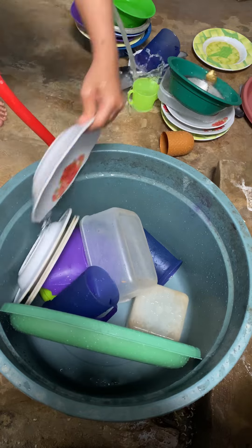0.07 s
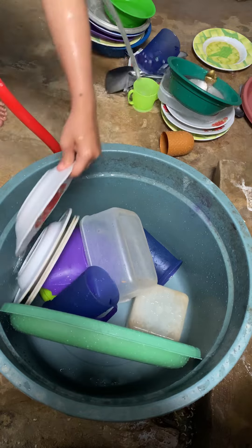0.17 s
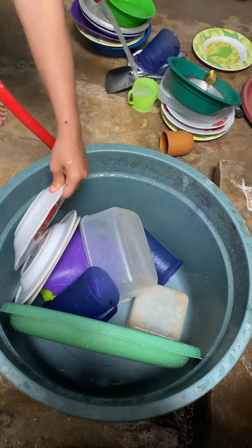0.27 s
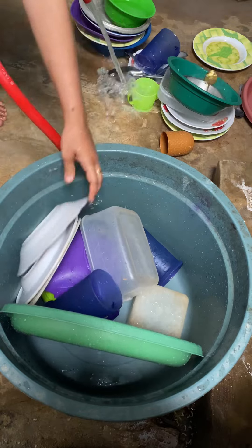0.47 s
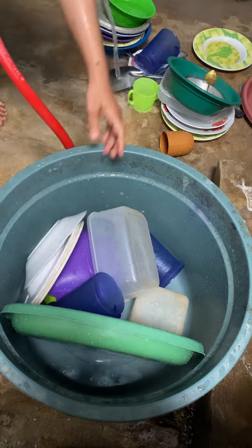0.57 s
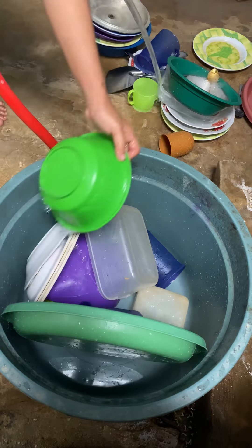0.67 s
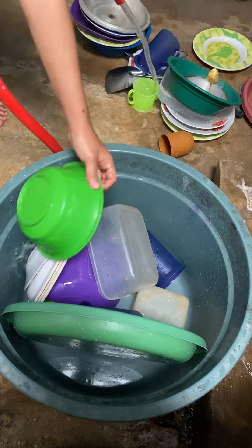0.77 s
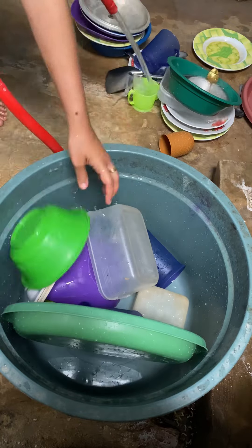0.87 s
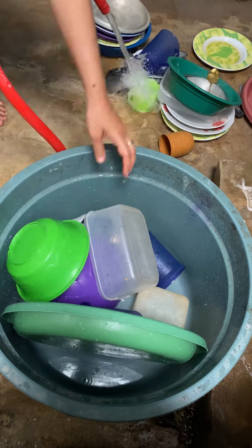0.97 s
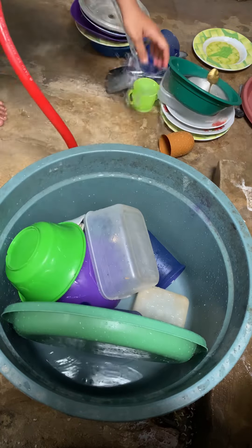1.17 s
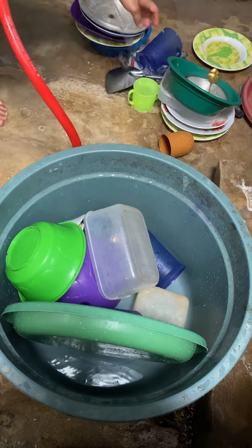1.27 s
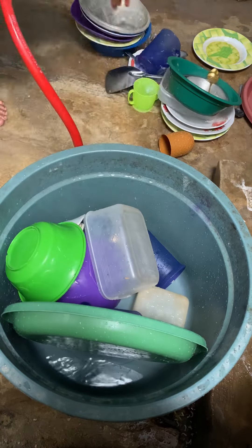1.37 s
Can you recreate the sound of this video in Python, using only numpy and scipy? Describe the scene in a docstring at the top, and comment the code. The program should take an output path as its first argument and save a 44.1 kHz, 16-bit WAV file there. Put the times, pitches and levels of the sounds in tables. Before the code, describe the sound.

Close, clattering dishes in an echoing yard. A plate clacks and rattles against other plates, a plastic tub gives one hollow thump, and a plastic bowl lands and bounces to rest, over a faint, steady spatter of hose water.

```python
"""A walled yard, where dishes are loaded into a big plastic tub close to the microphone.
A plate knocks against a stack and slides down it; the tub booms; a plastic bowl drops in and
bounces. Each contact gives a clack, a short note and the ring of the object, and echoes off the
walls. All the while, water from a hose hisses and spatters on the concrete nearby."""
import sys
import numpy as np
from scipy import signal
from scipy.fft import rfft, irfft, next_fast_len
from scipy.io import wavfile
from scipy.ndimage import uniform_filter1d

SR = 44100
rng = np.random.default_rng(int(sys.argv[2]) if len(sys.argv) > 2 else 0)


def transcribe(u):
    """Save the signal u as a 16-bit wav file named by the first command-line argument.

    u: samples, shape (n,) or (channels, n), limited to [-1, 1]; the rate is SR.
    q: integer samples, one column per channel.
    """
    v = np.clip(np.atleast_2d(u).T, -1, 1)
    q = np.round(v * 32767).astype(np.int16)
    wavfile.write(sys.argv[1], SR, q)


N = 61739
TIME = np.arange(N) / SR

# Stereo image of distant sound. Each row: frequency in Hz, left-right likeness (1 is mono).
FAR_LIKENESS = [(150, .97), (320, .88), (700, .35), (1400, .5), (3000, .25), (6000, .5), (10000, .78)]


def from_db(db):
    """Decibels to gain."""
    return 10 ** (np.asarray(db) / 20)


def at_hz(points, size):
    """A curve of (Hz, value) points at the bins of an FFT, joined on a log-frequency axis."""
    hz, values = np.transpose(points)
    return np.interp(np.log(np.fft.rfftfreq(size, 1 / SR) + 1), np.log(hz), values)


def colour(x, points):
    """Minimum-phase EQ through the given (Hz, dB) points, so nothing rings ahead of an attack."""
    size = next_fast_len(2 * x.shape[-1], True) * 2
    cepstrum = irfft(np.log(from_db(at_hz(points, size))))
    cepstrum[1:size // 2] *= 2
    cepstrum[size // 2 + 1:] = 0
    return irfft(rfft(x, size) * np.exp(rfft(cepstrum)))[..., :x.shape[-1]]


def stereo_noise(likeness, size):
    """White noise whose stereo width changes with frequency."""
    mid, side = rfft(rng.standard_normal((2, size)))
    alike = np.clip(at_hz(likeness, size), 0, 1)
    mid, side = mid * np.sqrt((1 + alike) / 2), side * np.sqrt((1 - alike) / 2)
    return irfft(np.array([mid + side, mid - side]), size)


def grain(size, depth_db, per_s):
    """A fast random flutter of gain, with mean power 1."""
    steps = from_db(depth_db * rng.standard_normal(N))
    gain = np.interp(np.arange(size) * per_s / SR, np.arange(N), steps)
    return gain / np.sqrt(np.mean(gain ** 2))


def hose_water():
    """Drops hit concrete in a fine spatter that follows the flow, with a few fuller splashes."""
    # Tone of the spatter. Each row: frequency in Hz, level in dB.
    spectrum = [(25, -5), (60, 1), (150, 4), (300, 1.5), (600, -2), (1000, -2.5), (1600, -1.7), (2800, .7),
                (5500, -1.8), (8000, -2), (11000, -2.3), (11900, -8), (12800, -40), (16000, -70)]
    # Strength of the flow. Each row: time in seconds, level in dB.
    flow = [(0, -32), (.08, -34.8), (.15, -33), (.21, -35.2), (.38, -35), (.45, -32.3), (.66, -32),
            (.8, -36), (1.05, -36), (1.15, -31.5), (1.24, -29.8), (1.32, -31.8), (1.4, -32.7)]
    # Splashes on the ground. Each row: start in seconds, level in dB, centre in Hz, fade in seconds.
    splashes = [(.043, -32.5, 1650, .018), (1.24, -36.5, 1450, .06), (1.345, -37, 540, .04)]
    spatter = stereo_noise(FAR_LIKENESS, N) * grain(N, depth_db=2.5, per_s=400)
    out = colour(spatter, spectrum) * from_db(np.interp(TIME, *np.transpose(flow)))
    width = .45  # a splash's bandwidth, roughly, as a share of its centre
    edge = 1 + width / 2
    for start, db, hz, fade_s in splashes:
        band = signal.butter(2, [hz / edge, hz * edge], "band", fs=SR, output="sos")
        burst = stereo_noise(FAR_LIKENESS, N) * (TIME > start) * np.exp(-np.abs(TIME - start) / fade_s)
        makeup = np.sqrt(SR / 2 / (hz * width))
        out += from_db(db) * makeup * signal.sosfilt(band, burst)
    return out


def ringing(contacts, modes):
    """Every contact sets all the modes ringing as dying sines, each with a slightly random strength."""
    starts, db, _, tilt, _, _ = np.transpose(contacts)
    spread_db = rng.standard_normal((len(starts), len(modes)))
    middle_hz = modes[len(modes) // 2][0]
    out = 0
    for k, (hz, level, t60) in enumerate(modes):
        strike_db = db + level + tilt * np.log2(hz / middle_hz) + spread_db[:, k]
        clicks = np.zeros(N)
        clicks[(starts * SR).astype(int)] = from_db(strike_db)
        decay, angle = from_db(-60 / (t60 * SR)), 2 * np.pi * hz / SR
        feedback = [1, -2 * decay * np.cos(angle), decay * decay]
        out += (-1) ** k * signal.lfilter([0, np.sin(angle)], feedback, clicks + 1e-18)
    return out


def clack(contacts, spectrum, fade_s, attack_s=.0006, size=4096):
    """Each contact chatters for some milliseconds and sets off many dense, quickly damped modes."""
    # Stereo image of close sound. Each row: frequency in Hz, left-right likeness (1 is mono).
    near_likeness = [(150, .99), (350, .9), (700, .66), (1400, .82), (3000, .52), (6000, .55), (10000, .88)]
    out, t = np.zeros((2, N + size)), TIME[:size]
    for start, db, chatter_s, tilt, _, _ in contacts:
        envelope = np.minimum(t / attack_s, 1) * np.exp(-np.maximum(t - chatter_s, 0) / fade_s)
        burst = stereo_noise(near_likeness, size) * envelope * grain(size, depth_db=2.3, per_s=1200)
        tone = [(hz, level + db + tilt * np.log2(hz / 1500)) for hz, level in spectrum]
        first = int(start * SR)
        out[:, first:first + size] += colour(burst, tone)
    return out[:, :N]


def ripple(x, depth_db=2.2, spacing_hz=70):
    """Many small, close resonances that all contacts on one object share."""
    hz = np.arange(600, 16000, spacing_hz)
    db = depth_db * rng.standard_normal(len(hz))
    db -= 10 * np.log10(np.mean(from_db(db) ** 2))  # keep the mean power
    return colour(x, [(500, 0), *zip(hz, db)])


def spot_notes(contacts, life_cycles, sharp, rise_s=.0012, spring_back_s=.014):
    """The struck spot sounds a short note; dented plastic starts sharp and sags as it springs back."""
    out = 0
    for start, _, _, _, hz, db in contacts:
        t = np.maximum(TIME - start, 0)
        cycles = hz * (t + sharp * spring_back_s * (1 - np.exp(-t / spring_back_s)))
        envelope = from_db(db - 60 * cycles / life_cycles) * (1 - np.exp(-t / rise_s))
        out += envelope * np.sin(2 * np.pi * cycles)
    return out


def yard_echo(x, build_s=.008):
    """Diffuse echo from walls and ground; each band dies at its own rate."""
    # Bands of the echo. Each row: centre in Hz, level in dB, seconds to fall 60 dB.
    bands = [(100, -1, .45), (200, 1.5, .52), (350, -1, .6), (700, -1.5, .95), (1300, -3, .5),
             (2600, -1.5, .38), (5200, -2.5, .32), (10500, -6, .26)]
    noise, tail = rfft(stereo_noise(FAR_LIKENESS, N)), 0
    for k, (_, db, t60) in enumerate(bands):
        share = at_hz([(row[0], j == k) for j, row in enumerate(bands)], N)
        equal_energy = np.sqrt(np.log(1e6) / (t60 * SR))
        tail += irfft(noise * share, N) * from_db(db - 60 * TIME / t60) * equal_energy
    tail *= 1 - np.exp(-TIME / build_s)
    return signal.fftconvolve(x.mean(0)[None], tail, axes=1)[:, :N]


def struck(contacts, modes, spectrum, ring_db, clack_db, clack_fade_s, echo_db, note_cycles, sharp=0):
    """A struck object: its ring, its clack, the notes of the struck spots and their echo."""
    # Each contact: start in seconds, level in dB, chatter in seconds, treble tilt in dB per octave,
    # the spot's note in Hz, that note's level in dB.
    near = from_db(ring_db) * ringing(contacts, modes)
    near = near + from_db(clack_db) * ripple(clack(contacts, spectrum, clack_fade_s))
    near += spot_notes(contacts, note_cycles, sharp)
    return near + from_db(echo_db) * yard_echo(near)


def tub():
    """The big plastic tub thuds softly under the dishes and booms at one hard bump."""
    # Bumps on the tub. Each row: a contact, as in struck().
    bumps = [(.002, -42, .01, -3, 120, -34), (.258, -33, .005, -1, 175, -29),
             (.34, -36, .008, -2.5, 115, -25), (.455, -39, .01, -3, 115, -35),
             (.486, -36, .005, -2, 205, -23), (.547, -31, .005, -2, 165, -21),
             (.568, -29, .008, -2, 195, -18), (.605, -29, .01, -2.5, 115, -17),
             (.6642, -7, .004, -.4, 575, -3.5), (.670, -18, .005, -2.6, 135, -11),
             (.674, -24, .012, 1, 410, -11.5), (.846, -30, .005, -1.5, 110, -24),
             (.861, -29, .005, -1, 110, -20), (.878, -25, .005, -1.5, 185, -14),
             (.928, -32, .005, -2.5, 205, -22)]
    # The tub's low modes. Each row: pitch in Hz, level in dB, seconds to fall 60 dB.
    modes = [(82, -21, .25), (126, -13, .27), (144, -8.5, .42), (180, -7, .12), (228, -9, .14),
             (328, -16, .3), (435, -7, .11), (474, -8, .19), (620, -1, .07), (705, -2, .1), (880, -17, .2),
             (1077, -10, .14), (1863, -17, .1)]
    # Tone of its dull clack. Each row: frequency in Hz, level in dB.
    spectrum = [(25, -38), (100, 7), (170, 14.5), (300, 0), (600, 17.5), (900, 5), (1500, -3), (3200, -5),
                (4500, -17), (9000, -25), (16000, -50)]
    return struck(bumps, modes, spectrum, ring_db=-4.3, clack_db=.6, clack_fade_s=.004,
                  echo_db=-8, note_cycles=19, sharp=.3)


def level_dips():
    """A gain that drops suddenly, twice, and comes straight back."""
    # Brief dips in level. Each row: start in seconds, depth in dB, recovery in seconds.
    dips = [(.027, -11, .017), (.626, -12, .033)]
    db = sum(depth * (TIME > start) * np.clip(1 - ((TIME - start) / recovery) ** 2, 0, 1)
             for start, depth, recovery in dips)
    return from_db(uniform_filter1d(db, size=64))


def plate_on_stack(cut_s=.6255, cut_fade_s=.0015):
    """The plate knocks and rattles down the stack; its sound and echo are cut off, as at an edit."""
    # The plate's knocks, then its slips down the stack. Each row: a contact, as in struck().
    knocks = [(.2402, -9.3, .005, .9, 1255, -13.5), (.2475, -12.5, .005, -.5, 1290, -12),
              (.2585, -10.5, .008, -.9, 900, -11.5), (.275, -25, .025, 0, 1900, -26),
              (.320, -20, .004, 2.7, 2850, -22), (.428, -32, .02, -1, 700, -37),
              (.46, -31, .015, 0, 1230, -40)]
    slips = [(.4798, -12.7, .005, 2.4, 3620, -14), (.488, -17, .010, 0, 810, -21),
             (.497, -22, .008, -.5, 1220, -19), (.5125, -17, .006, -.6, 760, -19),
             (.523, -18, .003, .3, 2400, -20), (.528, -10.5, .004, .1, 670, -11),
             (.5485, -16.8, .014, 0, 480, -26), (.569, -17.8, .011, -.4, 350, -21),
             (.5915, -16, .008, 0, 620, -21), (.606, -23.5, .011, .4, 6900, -25)]
    # Modes of plate and stack. Each row: pitch in Hz, level in dB, seconds to fall 60 dB.
    plate_modes = [(448, -12, .17), (690, -15, .4), (857, -4, .15), (1160, -3, .15), (1240, -3, .12),
                   (1306, -5, .1), (1682, -7, .11), (1872, -16, .13), (1922, -15, .16), (2780, -13, .16),
                   (2980, -11, .12), (3620, -13, .16), (3950, -13, .16), (6860, -11, .07)]
    stack_modes = [(390, -11, .12), (565, -10, .12), (680, -8, .1), (790, -14, .1), (1240, -12, .12),
                   (1410, -15, .08), (1859, -10, .11), (2331, -8, .09), (2450, -10, .07), (2803, -11, .09),
                   (3666, -10, .07), (5100, -10, .09), (5212, -11, .07), (6918, -13, .07)]
    # Tone of their bright clacks. Each row: frequency in Hz, level in dB.
    plate_spectrum = [(30, -35), (120, 2), (200, 3), (330, 0), (700, 4.5), (1200, 6.5), (2000, 1.5),
                      (3000, .5), (4300, -3), (6500, -4), (8000, -8), (11500, -6), (13500, -33),
                      (16000, -45)]
    stack_spectrum = [(30, -35), (110, -4), (220, 0), (340, 1), (700, 5.5), (1000, 1.5), (2500, 1),
                      (5500, .5), (8000, -4), (11500, -.5), (13500, -21), (16000, -21)]
    knocking = struck(knocks, plate_modes, plate_spectrum, ring_db=-6, clack_db=0, clack_fade_s=.006,
                      echo_db=-7, note_cycles=55)
    sliding = struck(slips, stack_modes, stack_spectrum, ring_db=-3.5, clack_db=-.3, clack_fade_s=.0065,
                     echo_db=-9, note_cycles=45)
    return (knocking + sliding) * np.exp(-np.maximum(TIME - cut_s, 0) / cut_fade_s)


def bowl():
    """A plastic bowl drops in and bounces to rest; two faint modes ring on."""
    # The landing and bounces. Each row: a contact, as in struck().
    hits = [(.841, -9, .004, 1.4, 640, -11), (.849, -15.5, .007, .8, 2350, -15),
            (.856, -23, .003, -1, 730, -13), (.8655, -13.5, .003, .1, 3400, -15),
            (.876, -11, .003, -.8, 670, -13), (.8995, -8, .004, .4, 545, -9),
            (.9105, -9.5, .011, .3, 680, -8), (.93, -24, .015, .8, 1200, -28),
            (.97, -26.5, .007, -.4, 720, -27), (1.008, -29, .005, -1, 1150, -27),
            (1.083, -36, .008, -2.5, 780, -32)]
    # The bowl's modes. Each row: pitch in Hz, level in dB, seconds to fall 60 dB.
    modes = [(231, -8, .22), (349, -11, .15), (549, 3.5, .08), (565, -24.5, 1.7), (590, -3.5, .08),
             (697, 1.5, .11), (742, -7, .15), (785, -17, 1.3), (878, -2, .1), (1145, -9, .1),
             (1668, -4, .1), (2300, -6, .07), (2958, -10, .07), (4150, -12, .1), (6150, -11, .12),
             (9300, -9, .05)]
    # Tone of its hollow clack. Each row: frequency in Hz, level in dB.
    spectrum = [(30, -32), (115, 6), (220, 6), (380, 2), (670, 12.5), (1000, 6), (1500, 1), (2400, 0),
                (4200, -3), (6300, -3), (8000, -9), (11500, -3.5), (13500, -29), (16000, -26)]
    return struck(hits, modes, spectrum, ring_db=-6.5, clack_db=.2, clack_fade_s=.0045,
                  echo_db=-11, note_cycles=32, sharp=.06)


def scene():
    """Plate, tub and bowl over running water; the whole mix dips briefly twice."""
    return (tub() + bowl() + plate_on_stack() + hose_water()) * level_dips()


def record(dry):
    """A microphone pair, unequal in phase and level, thins the bass, rounds peaks and cuts the top."""
    # Phase between the sides. Each row: frequency in Hz, lead of the left in radians.
    lead = [(100, 0), (300, -.15), (650, -.55), (1400, -.1), (2100, .3), (3000, 1.15), (4500, .5),
            (6500, .65), (8500, 1.9), (10500, 2.4), (12500, 2.9)]
    # Balance between the sides. Each row: frequency in Hz, left minus right in dB.
    balance = [(150, 0), (650, .9), (1400, -1.7), (3000, -2.6), (6000, -2.4), (10000, .4)]
    size = 2 ** 17
    left = from_db(at_hz(balance, size) / 2) * np.exp(.5j * at_hz(lead, size))
    heard = irfft(rfft(dry, size) * np.array([left, 1 / left]))[:, :N]
    low_cut = signal.butter(2, 38, "high", fs=SR, output="sos")
    high_cut = signal.cheby2(12, 70, 16800, fs=SR, output="sos")
    rounded = np.tanh(signal.sosfilt(low_cut, heard))
    return signal.sosfilt(high_cut, rounded)


dry = scene()
out = record(dry)
transcribe(out)
```